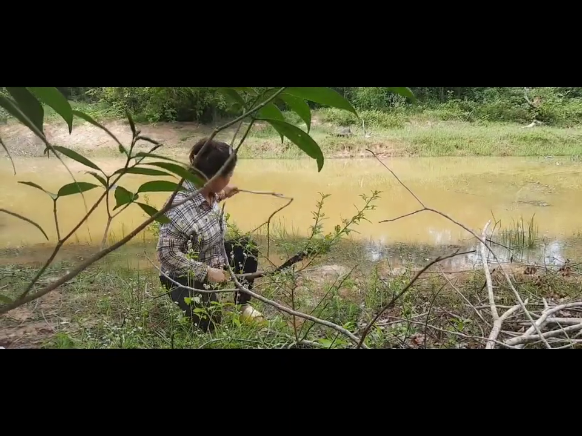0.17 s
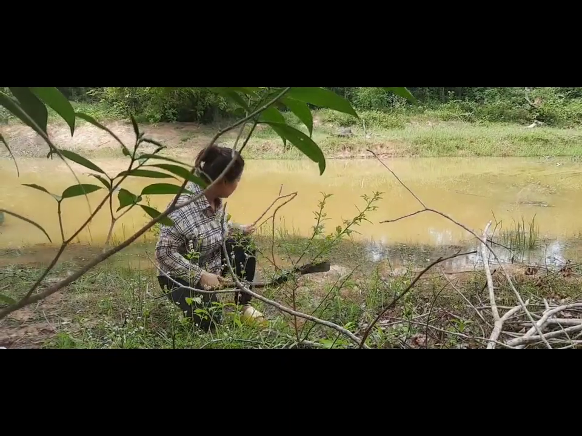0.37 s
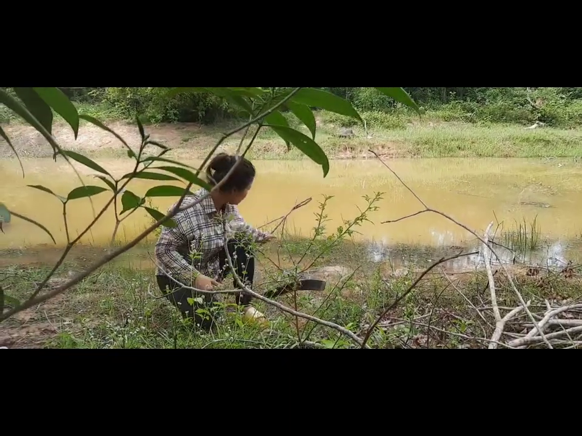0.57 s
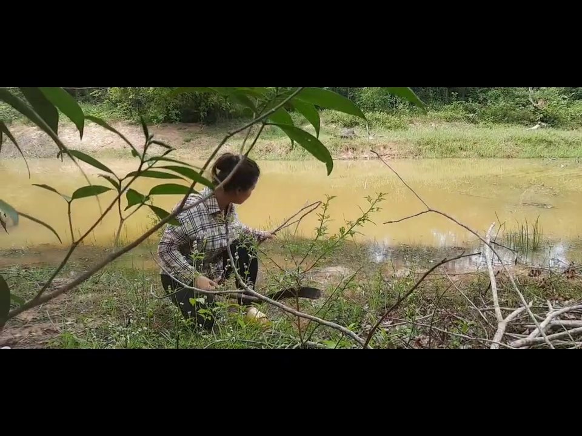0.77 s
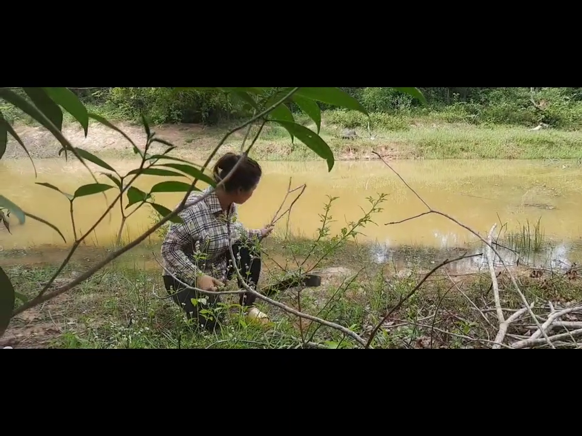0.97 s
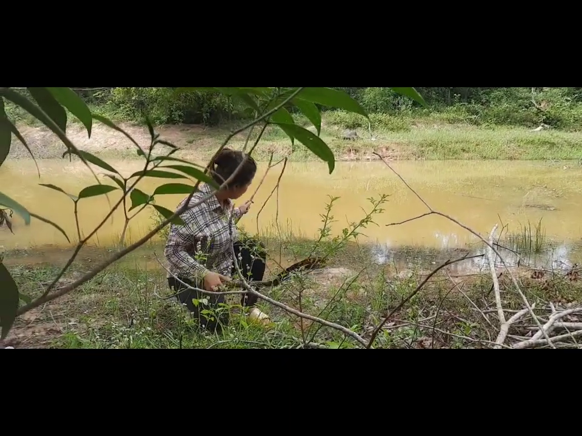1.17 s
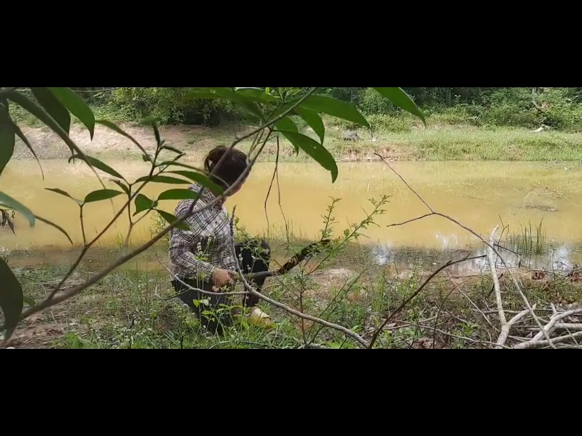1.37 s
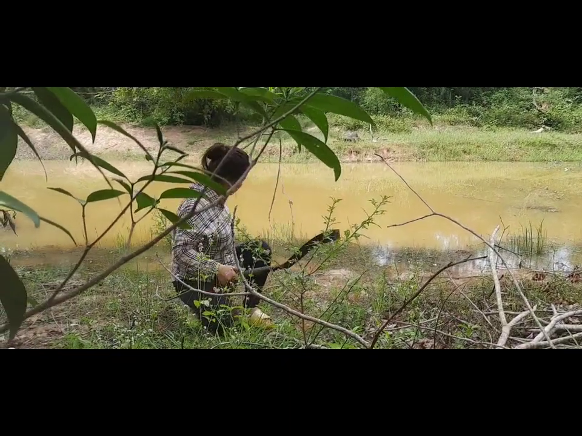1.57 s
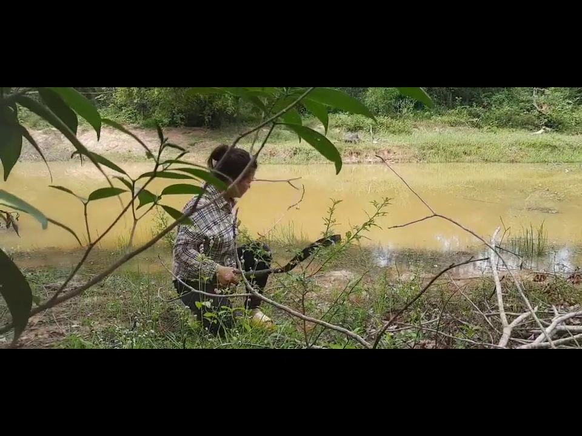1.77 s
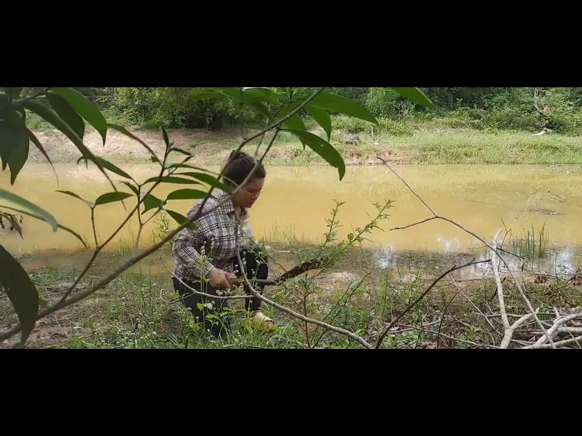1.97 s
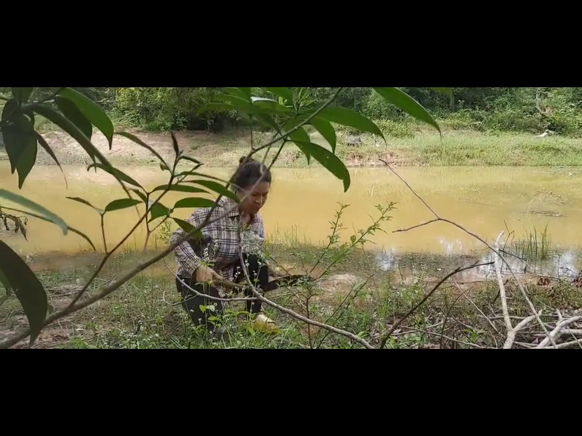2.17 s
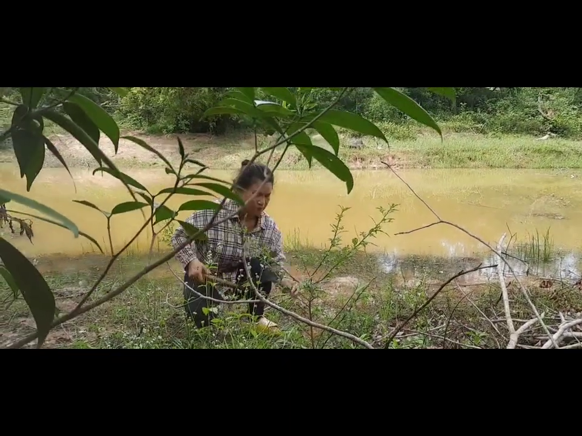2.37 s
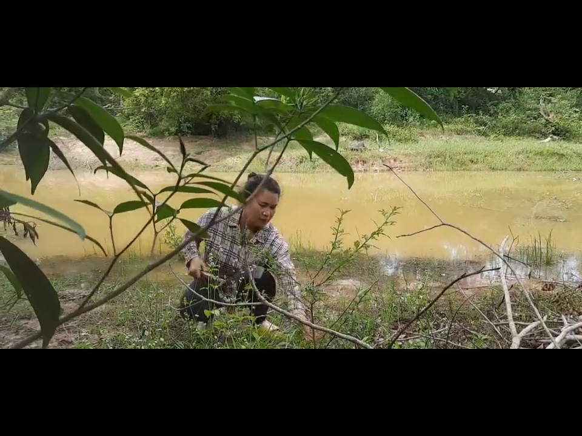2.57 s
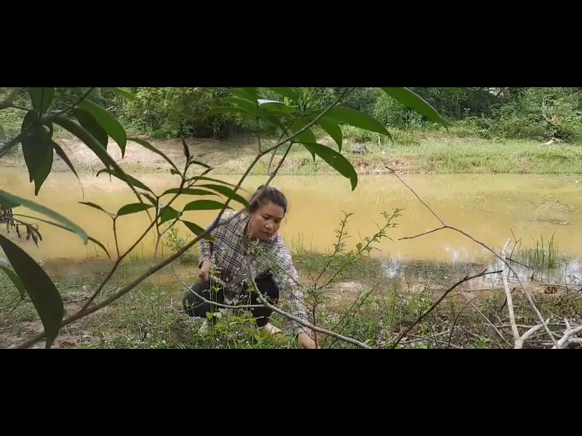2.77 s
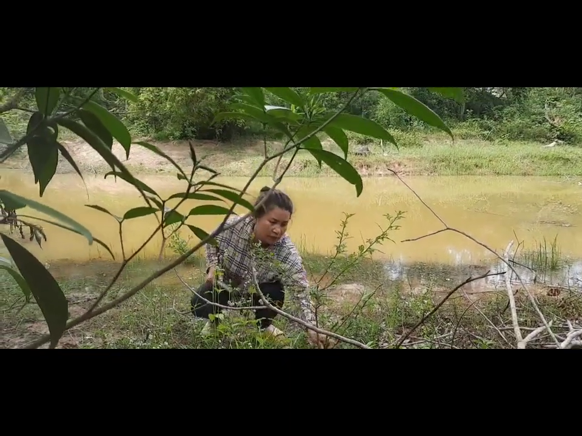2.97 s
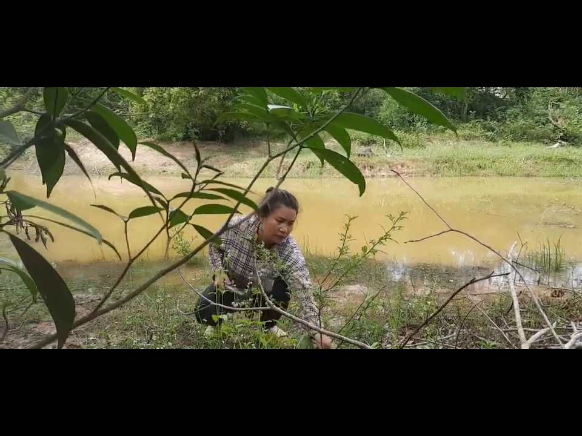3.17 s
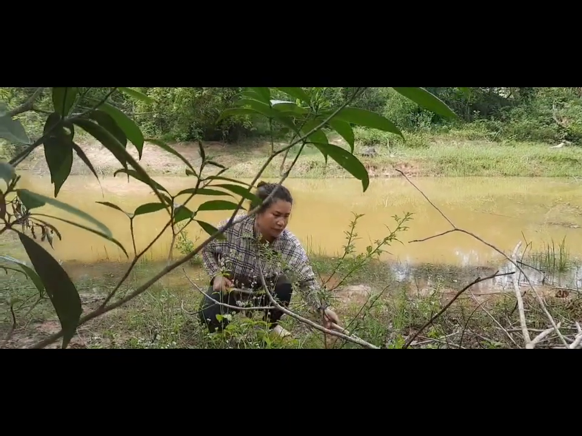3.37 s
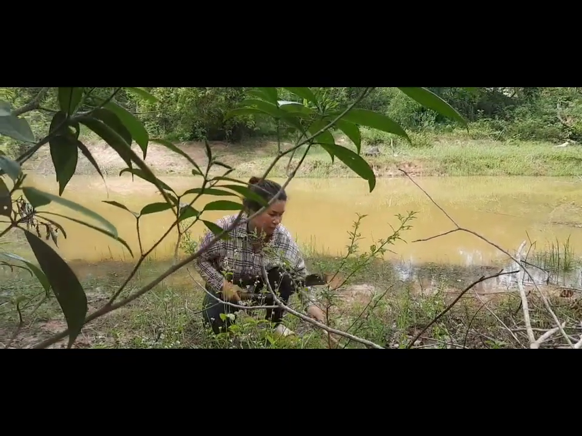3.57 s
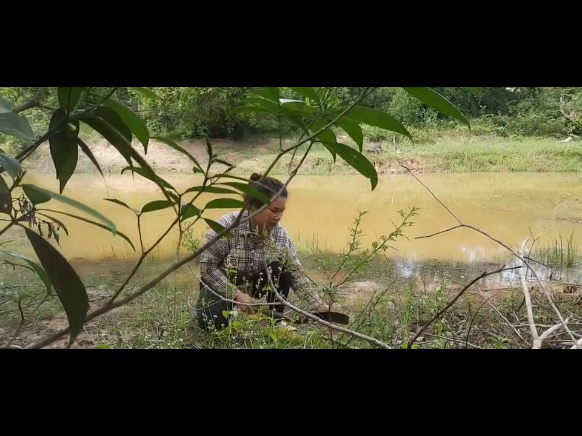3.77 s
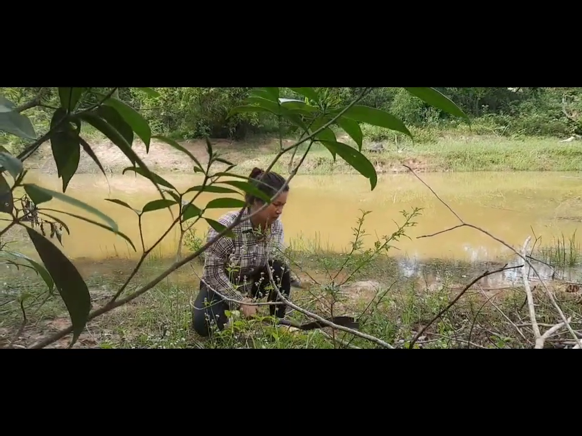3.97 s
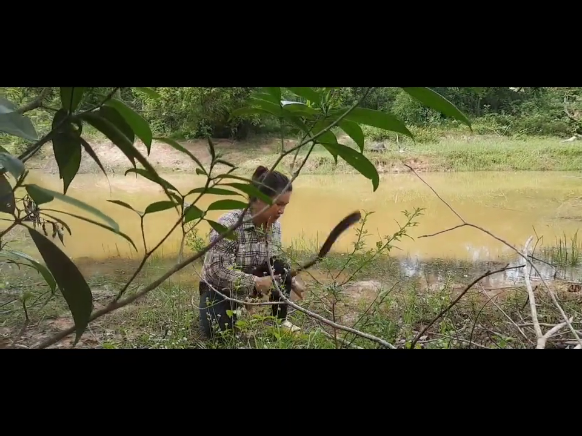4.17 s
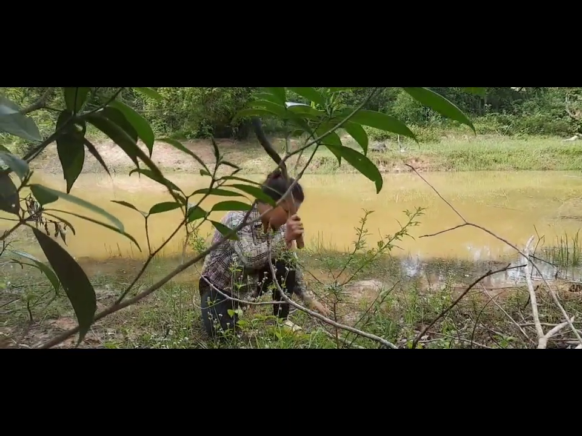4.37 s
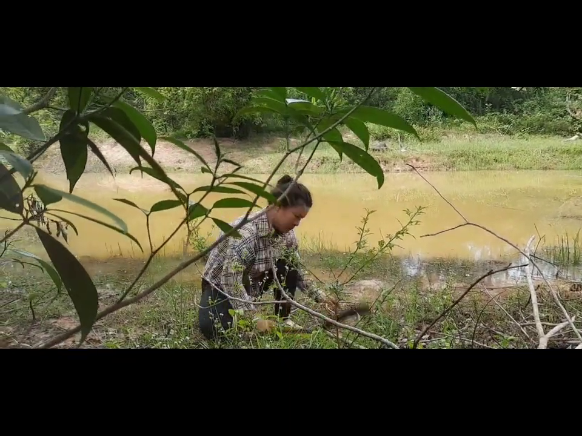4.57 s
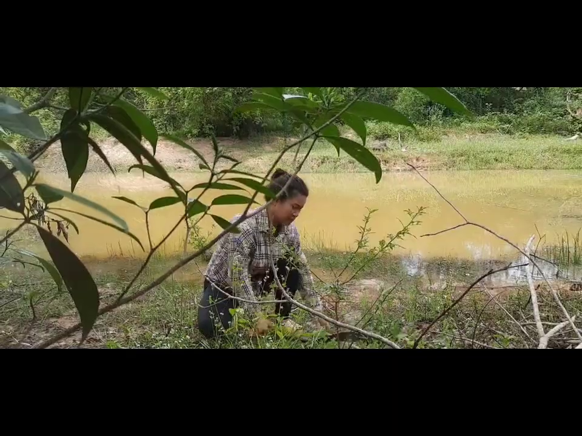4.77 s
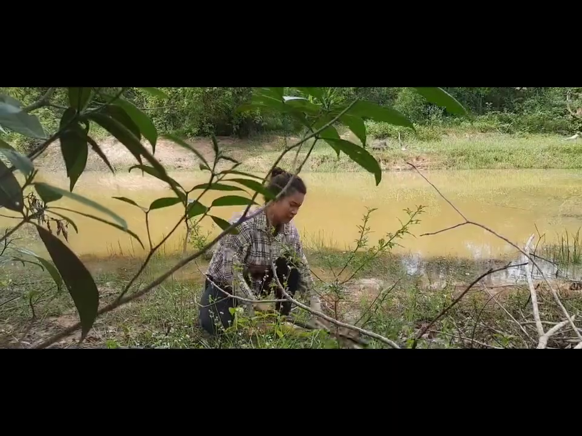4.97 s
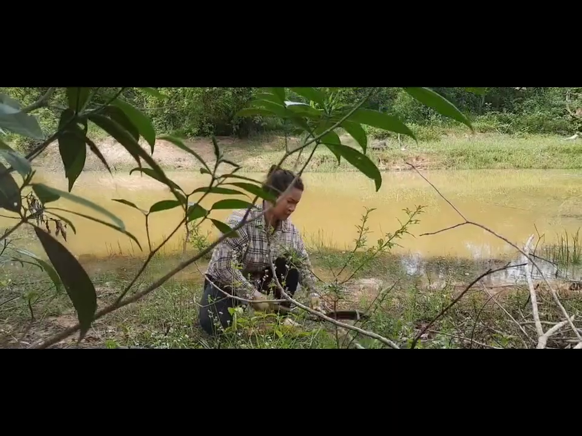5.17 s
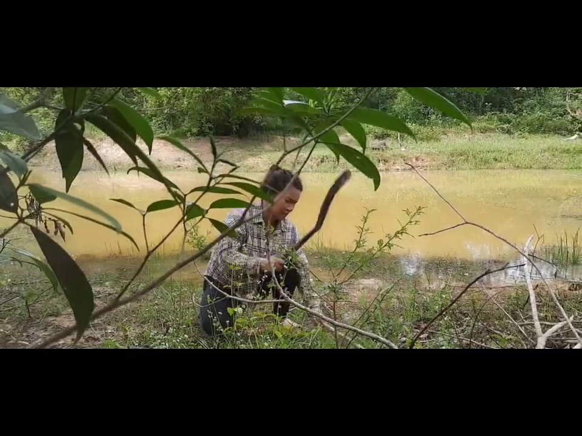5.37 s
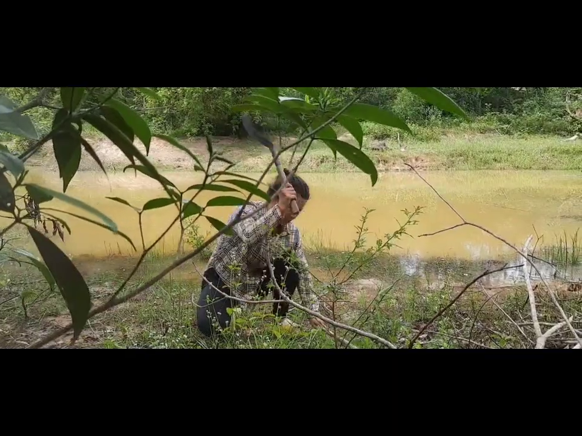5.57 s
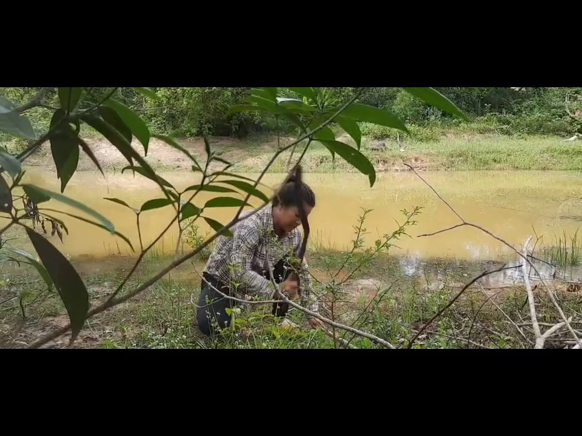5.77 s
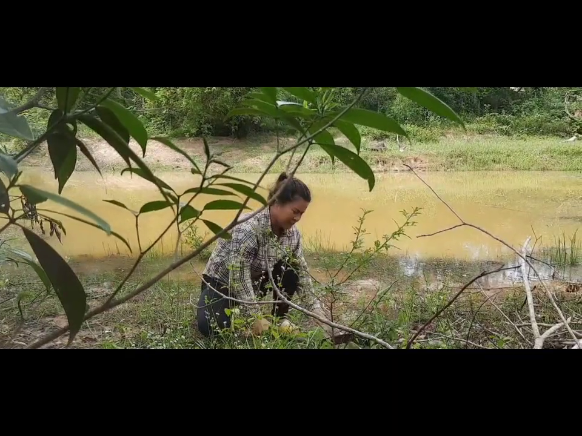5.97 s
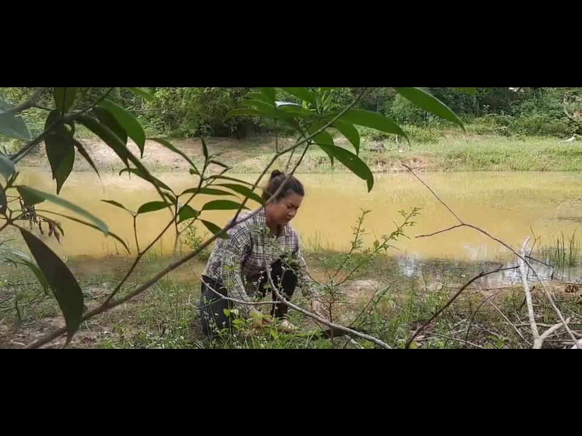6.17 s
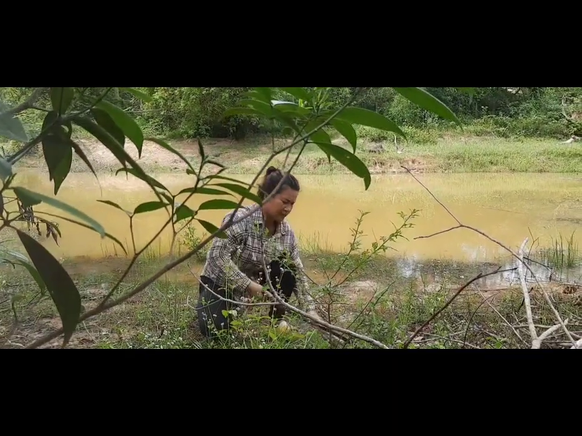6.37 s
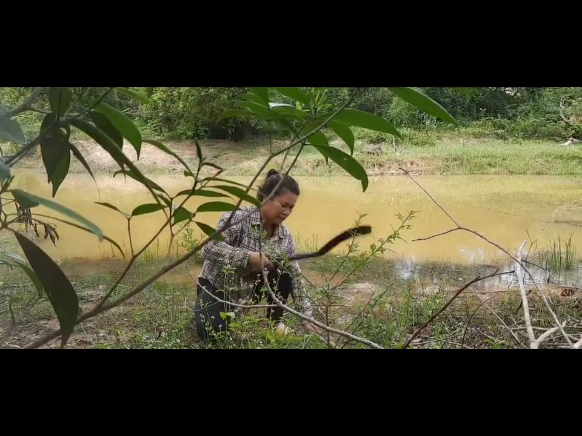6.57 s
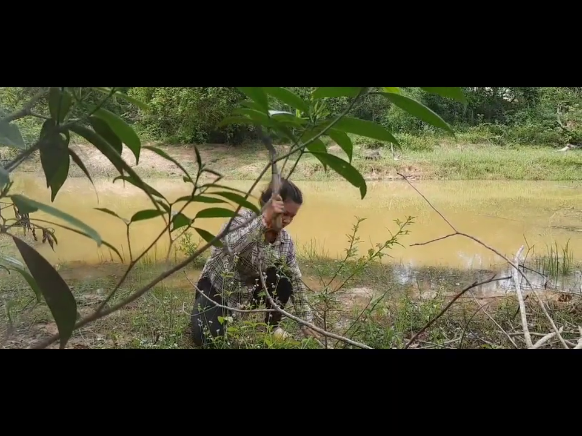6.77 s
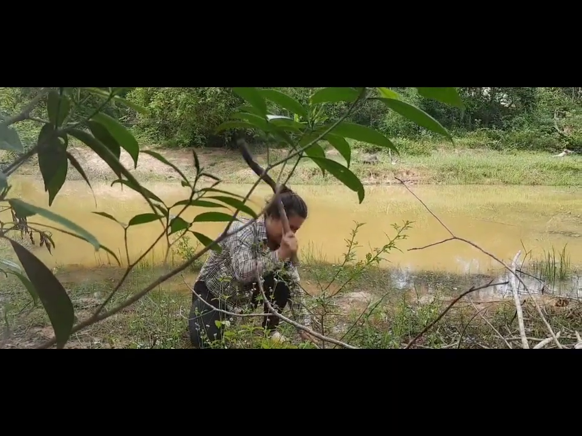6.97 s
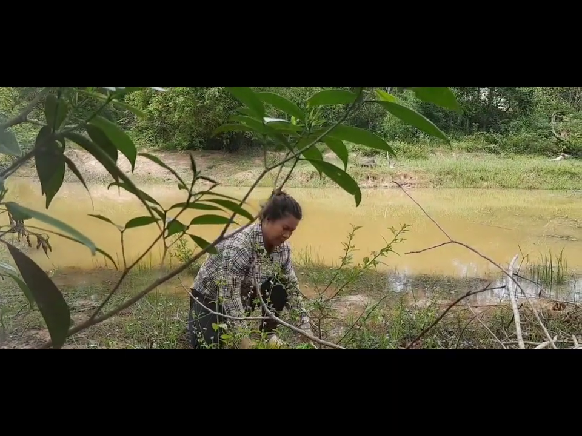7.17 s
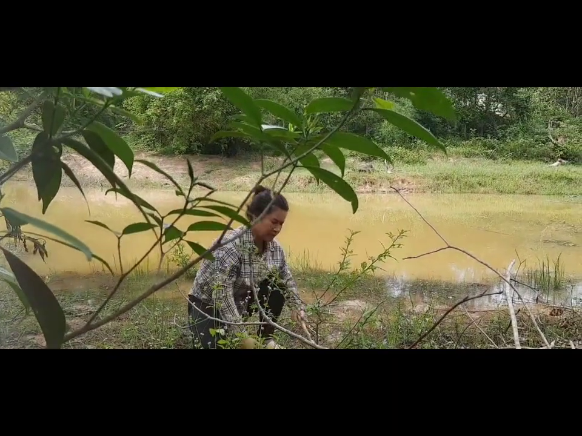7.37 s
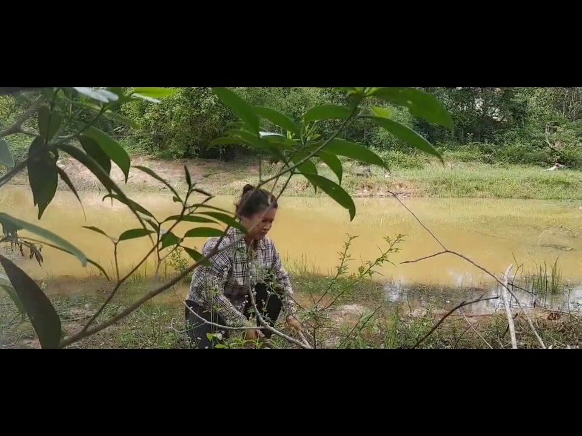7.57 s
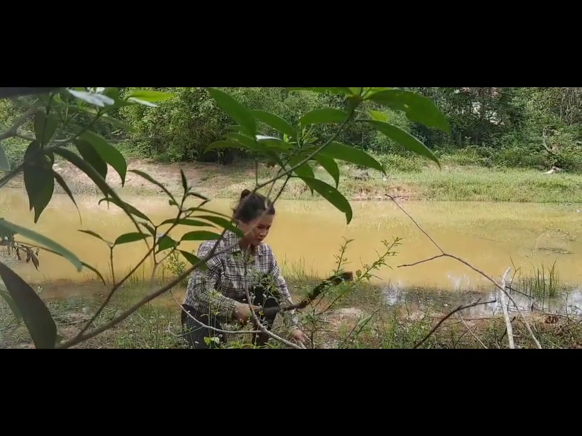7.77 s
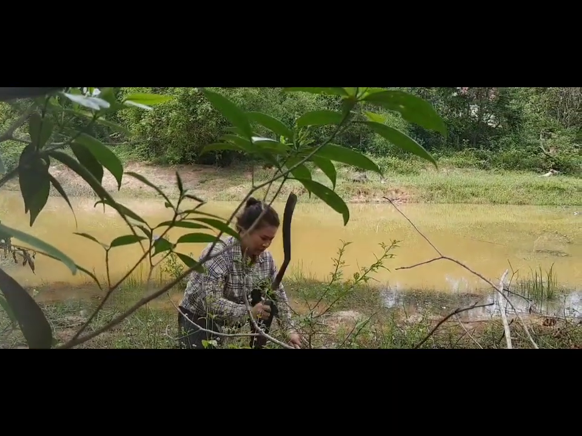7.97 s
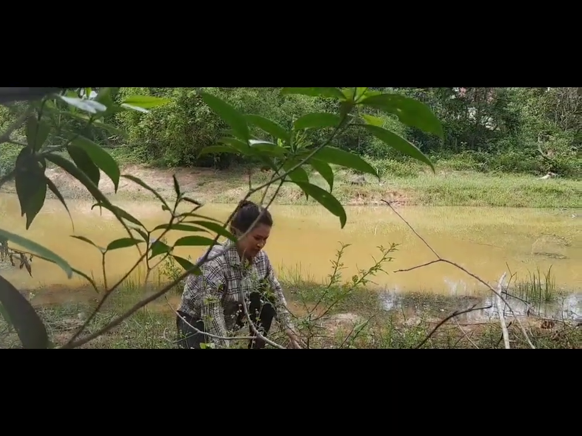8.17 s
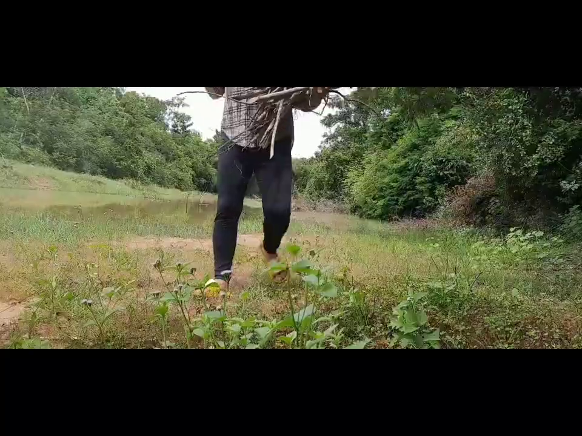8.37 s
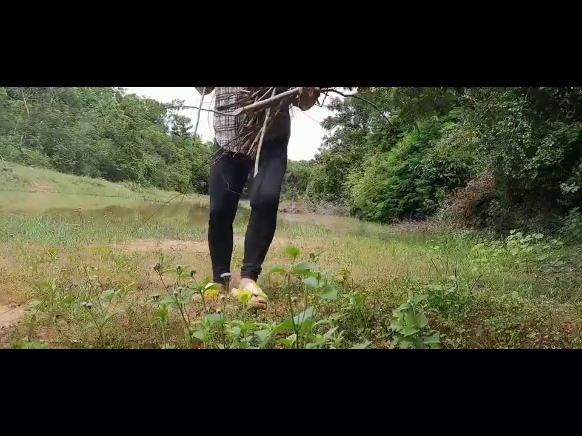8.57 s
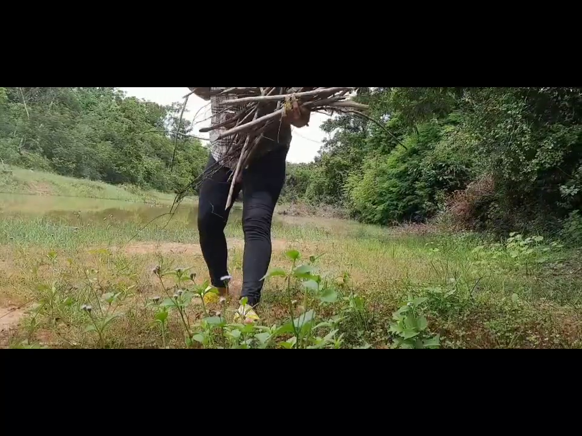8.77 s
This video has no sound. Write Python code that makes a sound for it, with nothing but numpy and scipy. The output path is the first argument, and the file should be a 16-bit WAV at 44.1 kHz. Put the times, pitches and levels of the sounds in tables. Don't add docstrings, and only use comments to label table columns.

```python
import sys
import numpy as np
from scipy import signal
from scipy.fft import rfft, irfft, next_fast_len
from scipy.io import wavfile

SR = 44100
rng = np.random.default_rng(int(sys.argv[2]) if len(sys.argv) > 2 else 0)


def amplitude_ratio(level_db):
    exponent = np.asarray(level_db, float) / 20
    return 10 ** exponent


def put_to_file(sound):
    columns = np.atleast_2d(sound).T
    safe = np.clip(columns, -1, 1)
    whole_steps = np.round(safe * 32767)
    wavfile.write(sys.argv[1], SR, whole_steps.astype(np.int16))


N = 388068
HZ = np.maximum(np.arange(next_fast_len(N) // 2 + 1) * SR / next_fast_len(N), 1)
DROPOUT_START_S, DROPOUT_END_S = 8.25, 8.281

# start in seconds, crack peak in dB, crack build-up in seconds, brightness in dB,
# hollow part in dB.
BLOWS = [
    (4.6031, -3, 0.0031, 6, -5),
    (5.8564, -2.5, 0.0044, 1, 1.5),
    (7.1215, -2.5, 0.0022, -2, -5),
    (8.1283, -8.5, 0.004, 0, -11),
]
# full weight lands in seconds after the start, bite of the edge in dB,
# ground wave in dB, loose debris in dB.
WEIGHTS = [
    (.004, -15, -37, -48),
    (.005, -13, -38, -47),
    (.0045, -14, -36, -48),
    (.0042, -32, -41, -56),
]
# mode in Hz, level in dB, 60 dB decay in seconds.
THUD_1 = [(132, 3, 0.06), (215, -10, 0.042), (312, -7.5, 0.056), (390, -10.5, 0.029), (735, -13, 0.04),
          (950, -11, .02), (2300, -18.5, 0.024)]
THUD_2 = [(140, 3.5, 0.055), (275, 3.5, 0.034), (404, 2, .04), (543, -13, 0.01), (711, -6, .025),
          (850, -10, 0.02), (1250, -7, .022)]
THUD_3 = [(137, 3, 0.061), (278, -5.5, 0.044), (380.3, -3.5, 0.02), (438, -11.5, 0.077), (800, -8.5, 0.016),
          (1560, -11, .03), (1800, -11, .03)]
THUD_4 = [(139, -9.5, 0.055), (280, -21, .05), (400, -25, .04), (1000, -25.5, 0.038), (1330, -14, 0.02),
          (1837, -19.5, .05)]
# frequency in Hz, density in dB per Hz.
CRACK = [(290, -29), (500, -3), (579, -10.5), (1000, -12), (1760, -7), (3450, -21), (6010, -8.5),
         (8540, -21), (11100, -14.5), (15600, -24), (16500, -37)]
# frequency in Hz, likeness from -1 to 1.
BLOW_LIKENESS = [(500, 0.72), (1500, 0.21), (4000, .2), (12000, 0.)]
# mode in Hz, level in dB, 60 dB decay in seconds.
BLADE = [(3630, -14, 0.082), (4020, -2.5, 0.03), (5230, -19, 0.079), (7200, -6.5, 0.086),
         (10800, -11, 0.028)]
# time in seconds, level in dB.
BLADE_TAPS = [
    (3.7265, -35.5),
    (7.403, -30.5),
]

# time in seconds, bright edge peak in dB, edge centre in Hz, left-right in dB.
TICKS = [(0.6784, -67, 6660, 4.0), (2.0781, -27, 12500, 2.0), (2.5664, -66, 12000, 7.0),
         (2.789, -44, 12900, 8.5), (2.8365, -42, 11100, 8.0), (2.8873, -52, 10200, 6.5),
         (2.9917, -49, 6880, 4.0), (3.2369, -40, 11100, 6.0), (3.276, -32, 6720, 5.5),
         (3.316, -38, 11200, 4.0), (3.6602, -38, 12900, 6.0), (3.6854, -40, 12400, 6.0),
         (3.9264, -59, 12300, 4.0), (4.0667, -58, 9030, 5.5), (4.1249, -49, 8170, 2.5),
         (4.803, -35, 11300, 4.0), (4.8712, -35, 11500, 3.0), (4.9141, -49, 8050, 4.0),
         (4.9355, -43, 10900, 4.5), (5.1561, -43, 11600, 5.0), (5.3288, -46, 11200, 5.0),
         (5.3574, -50, 12100, 4.5), (5.4659, -42, 11200, 4.0), (6.0256, -29, 10600, 3.5),
         (6.2964, -46, 12400, 5.0), (6.554, -51, 7040, 4.5), (6.6474, -56, 10900, 3.5),
         (7.2613, -32, 7440, 0.0), (7.2708, -44, 6510, 2.5), (7.623, -52, 7060, 5.0),
         (8.3089, -43, 7110, -1.0), (8.5174, -61, 7040, -0.5)]
# time in seconds, bright edge peak in dB, ringing in Hz, its level in dB.
SNAPS = [(.0334, -64, 1290, -17), (.166, -46, 4340, -7), (.187, -37, 3000, -14), (.2344, -42, 1400, -16),
         (.4524, -58, 4290, -15), (.5531, -59.5, 1310, -2.5), (.7542, -54.5, 1640, -11),
         (.9814, -55, 1640, -12), (1.1094, -64, 4420, 0), (2.0787, -39, 4200, 2), (3.049, -50, 1480, -6),
         (3.1058, -31, 4950, -1), (3.1742, -36, 1820, -8.5), (3.3344, -41.5, 4540, -7),
         (3.4096, -32, 1910, -12), (3.5724, -40, 4370, -1), (3.5785, -37, 4500, 0), (3.595, -41, 4800, 0),
         (3.869, -44, 4000, -3), (3.9938, -54, 4220, -9), (4.115, -49, 1470, -6),
         (4.1844, -46.5, 1510, -17), (4.9796, -41, 2080, -16), (6.1784, -46, 3980, -11),
         (6.3594, -48, 4520, -9), (7.391, -37.5, 3780, -7.5), (7.4035, -18, 2100, -15)]
# time in seconds, bright edge peak in dB, ringing in Hz, its level in dB,
# dull part in dB.
KNOCKS = [(.156, -51, 3490, -24, -10), (.2094, -41, 3720, -3.5, -14), (.7244, -64.5, 1560, 6, -11),
          (1.7294, -69, 1300, 4, 2.5), (2.0138, -35, 1490, -17, -14), (2.1276, -49, 3950, 3.5, -9),
          (2.1544, -62.5, 1520, 4, -17), (2.2994, -60.5, 1540, -6, -18), (3.727, -33, 4400, -2, -16),
          (3.7275, -45, 1600, 6, -6), (3.7494, -40, 1500, -1.5, -11), (4.7047, -37, 1720, -1.5, -2),
          (4.7535, -45, 1700, 3, 0), (4.7396, -31, 1450, -9, -11), (5.9605, -28, 1600, -7, -13),
          (6.0726, -38.5, 1400, -1.5, -7), (7.2244, -41, 1900, -4, -6), (8.3285, -44, 4600, -3, 3),
          (8.7944, -47.5, 1000, -21, 17)]

# fullest at seconds, 20 dB rise in seconds,
# 20 dB fall in seconds, leaves in dB, twigs over leaves in dB.
DRAGS = [(.012, .02, .25, -82, -12), (.455, .02, .04, -62, -12), (.98, .02, .03, -68, -8),
         (2.255, .03, .07, -62, -10), (.195, .03, .1, -50, -7), (.417, .12, .5, -69.5, -8),
         (.763, .08, .08, -68, -3), (1.081, .4, .2, -77, -6), (1.9, .7, .1, -80, -7),
         (2.025, .015, .03, -52, -10), (2.06, .03, .7, -66, -6), (2.815, .13, .1, -59, -14),
         (3.01, .03, .2, -61, -14), (3.062, .02, .06, -64, 3), (3.413, .008, .04, -43, -8),
         (4.02, .02, .03, -62, -8), (4.432, .015, .05, -59, -8), (3.18, .008, .04, -55, -5),
         (3.245, .008, .06, -54, -12), (3.7, .04, .03, -53, -10), (6.358, .03, .04, -53, -10),
         (6.52, .05, .08, -63, -14), (3.43, .45, .3, -48.5, -7), (3.582, .07, .1, -49, -3),
         (3.72, .2, .08, -55, -3), (3.865, .08, .05, -54, 0.5), (4.13, .13, .2, -65, -5),
         (4.53, .3, .08, -66, -13), (5.335, .55, .28, -57.5, -12), (6.34, .5, .55, -59.5, -11),
         (7.8, .5, .9, -77, -4), (7.63, .05, .1, -66, -11)]
REBOUNDS = [
    (4.709, .04, .2, -46.5, -3),
    (4.808, .012, .05, -49, -8),
    (4.93, .2, .22, -59, -7),
    (6.004, .05, .12, -47.5, -8),
    (6.11, .05, .6, -62, -5),
    (7.26, .04, .45, -63, 3),
    (7.43, .02, .24, -58, -7),
]
STEPS = [
    (8.322, .04, .14, -66, 2.5),
    (8.66, .22, .6, -60, -12),
    (8.77, .15, .1, -66, 9),
]
# frequency in Hz, density in dB per Hz.
LEAVES = [(3350, -34.5), (5700, 2.5), (7040, -2), (7880, -10), (10900, -1.5), (12200, -2), (14200, -2.5),
          (16000, -9)]
# frequency in Hz, density in dB per Hz.
TWIGS = [(590, -38), (1000, -14.5), (1190, -11.5), (1440, -1), (2780, -6), (3030, -8.5), (4800, -1),
         (6240, -33.5), (10600, -120)]
# frequency in Hz, width in Hz, level in dB.
STICK = [(694, 81, -9), (1490, 50, 0), (1720, 40, -2), (2130, 40, -5), (2510, 67, -6), (2730, 40, -8),
         (3250, 40, -11), (3650, 40, -6), (3980, 94, -3), (4190, 40, -9), (5900, 40, -9), (6160, 40, -9)]
# time in seconds, level in dB.
SCRAPE = [
    (3.725, -90.),
    (3.74, -66),
    (3.775, -63),
    (3.8, -71),
    (3.84, -53),
    (3.87, -47),
    (3.895, -88),
]

# start in seconds, end in seconds, centre in Hz, width in Hz, level in dB.
NARROW_SOUNDS = [(0., .15, 6940, 1300, -75.5), (1.78, 2., 7220, 270, -72), (1.86, 2., 7740, 700, -77),
                 (6.39, 6.53, 7100, 300, -69), (3.85, 4.1, 36, 25, -59), (5.07, 5.25, 36, 25, -72),
                 (4.69, 4.728, 480, 420, -49), (8.56, 8.78, 12600, 1200, -69), (1.5, 1.62, 2150, 60, -84),
                 (6.69, 6.75, 2160, 80, -81), (7.94, 8.11, 3900, 600, -78), (4.44, 4.485, 62, 50, -55),
                 (3.955, 4.0, 62, 50, -55), (1.71, 1.8, 1330, 360, -77), (8.57, 8.74, 1170, 320, -68),
                 (8.55, 8.79, 2140, 1200, -64), (8.281, 8.37, 3850, 400, -73), (8.36, 8.5, 3800, 400, -81),
                 (8.35, 8.8, 208, 43, -67.5), (6.15, 6.55, 310, 150, -70), (2.0, 2.06, 288, 200, -65)]
# time in seconds, pitch in Hz, level in dB.
FAR_CALL = [
    (7.7, 520, -89.),
    (7.799, 534, -82),
    (7.9, 571, -86.5),
    (8.05, 600, -88),
    (8.12, 587, -89),
]
# time in seconds, level in dB.
CHORUS = [
    (0., -58),
    (2.0, -57),
    (3.8, -55),
    (4.6, -58),
    (8.8, -58),
]
# pitch in Hz, level in dB.
SINGERS = [(5190, -67), (5260, -65), (5335, -66)]

# time in seconds, rumble in dB.
BREEZE = [
    [(0.0, -66), (1.15, -62), (1.7, -64.5), (1.9, -59.5), (3.08, -63.5), (3.75, -57.5), (4.1, -58),
     (4.3, -65), (4.75, -59), (4.95, -64), (5.76, -67), (5.95, -59), (6.2, -64), (6.61, -64), (7.2, -59),
     (7.35, -63), (8.15, -66)],
    [(8.3, -45), (8.362, -51), (8.8, -54)],
]
# frequency in Hz, density in dB per Hz.
RUMBLE = [(12, -53), (20, -24), (65, -2), (86, 2), (129, -3), (149, -9), (178, -17), (220, -28), (290, -53),
          (480, -120)]
# frequency in Hz, density in dB per Hz.
AIR = [(150, -12.5), (330, 5.5), (600, -7), (1500, -13), (4000, -16.5), (6500, -15.5), (8500, -19.5),
       (10000, -19), (10800, -9), (11900, -16), (13500, -17.5), (16000, -21)]
# frequency in Hz, gain in dB.
QUIET_TOP = [(15700, 0.), (16100, -40.)]
# frequency in Hz, likeness from -1 to 1.
LIKENESS = [(60, 0.89), (180, 1), (550, 0.42), (1650, 0.049), (4970, -0.017), (15000, -0.29)]
# frequency in Hz, left-right in dB.
PORTS = [(60, 2.5), (110, 0.5), (200, 2.5), (380, -0.5), (700, 6.5), (1290, 3.5), (2380, 2.5), (4400, 1.5),
         (8120, 1), (15000, 8)]

THUD_DB = -10.0
GROUND_HZ, GROUND_TROUGH_S, GROUND_PEAK_S, GROUND_RIGHT_DB = 59, .042, .03, -3
TICK_HZ, TICK_RING_DB = 4200, -25
THIN_DULL_DB = -36
EDGE_HZ, EDGE_SPREAD = 7500, 1.75
PILE_PAN_DB, PATH_PAN_DB = 4, -8
JOLT_S, JOLT_DB, JOLT_FALL_S, JOLT_TWIGS_DB = .02, -35.5, .097, -2
WOOD_DB, WOOD_FALL, TWIG_FALL = -10, .6, .95
STILL_DB, WOOD_STILL_DB = -97, -87
BUZZ_RISE = .4
CHORUS_HZ, CHORUS_WIDTH_HZ = 5240, 335
SKIRT_DB, SKIRT_WIDTH_HZ = -28.5, 600
PATH_CHORUS_HZ, PATH_CHORUS_WIDTH_HZ, PATH_CHORUS_DB = 5130, 250, -58.5
AIR_DB = -78.5
MURMUR_DB, MURMUR_FOLLOWS, MURMUR_TOP_DB = -77, 2.4, -68


def rms_one(x):
    return x / np.sqrt(np.mean(x ** 2) + 1e-20)


def in_time(tables):
    rows = list(tables[0])
    for table in tables[1:]:
        hold_until = max(table[0][0] - .02, rows[-1][0])
        rows += [(hold_until, *rows[-1][1:]), *table]
    s, *columns = np.transpose(rows)
    return [np.interp(np.arange(N) / SR, s, column) for column in columns]


def at_hz(points):
    hz, value = np.transpose(points)
    return np.interp(np.log(HZ), np.log(hz), value)


def colour(x, gain):
    size = next_fast_len(N)
    return irfft(rfft(x, size) * gain, size)[..., :N]


def band(x, low_hz, high_hz, order=2):
    edges = np.clip([low_hz, high_hz], 15, .45 * SR)
    return signal.sosfilt(signal.butter(order, edges, "band", fs=SR, output="sos"), x)


def stereo_noise(likeness):
    alike = np.clip(at_hz(likeness), -1, 1)
    mid, side = rng.standard_normal((2, N))
    mid = colour(mid, np.sqrt(1 + alike))
    side = colour(side, np.sqrt(1 - alike))
    return rms_one(mid + side * [[1], [-1]])


def drift(rate):
    r = np.exp(-40 * np.pi * rate / SR)
    slow = signal.lfilter([1], [1, -2 * r, r * r], rng.standard_normal(N // 20 + 3002))
    slow = slow[3000:]
    return np.interp(np.arange(N) / 20, np.arange(len(slow)), rms_one(slow))


def ring(clicks, hz, t60):
    r, w = amplitude_ratio(-60 / (t60 * SR)), 2 * np.pi * hz / SR
    return signal.lfilter([0, np.sin(w)], [1, -2 * r * np.cos(w), r * r], clicks + 1e-18)


def add(out, s, piece):
    at = round(s * SR)
    out[:, at:at + piece.shape[-1]] += piece[..., :N - at]


def crackle(per_s, spread_db, tick_s, bed):
    sizes = amplitude_ratio(spread_db * np.minimum(rng.exponential(1, N), 4)) * (rng.random(N) < per_s / SR)
    bursts = signal.lfilter([1], [1, -np.exp(-1 / (tick_s * SR))], sizes)
    return bed + bursts / bursts.mean()


def patches(x, low_hz, high_hz, count, patchy_db, rate):
    edges = np.geomspace(low_hz, high_hz, count + 1)
    total = 0
    for k, (low, high) in enumerate(zip(edges, edges[1:])):
        total = total + (-1) ** k * amplitude_ratio(patchy_db * drift(rate)) * band(x, low, high)
    return rms_one(total)


def swells(peak_s, rise_s, fall_s, db, still_db):
    since = np.arange(0, N, 20) / SR - peak_s[:, None]
    down = np.where(since < 0, -since / rise_s[:, None], since / fall_s[:, None])
    power = amplitude_ratio(2 * still_db) + amplitude_ratio(2 * (db[:, None] - 20 * down)).sum(axis=0)
    return np.interp(np.arange(N) / 20, np.arange(len(power)), np.sqrt(power))


def blows():
    out, age = np.zeros((2, N)), np.arange(round(.4 * SR)) / SR
    splinter = colour(stereo_noise(BLOW_LIKENESS), amplitude_ratio(at_hz(CRACK)))
    for k, (row, weight, modes) in enumerate(zip(BLOWS, WEIGHTS, (THUD_1, THUD_2, THUD_3, THUD_4))):
        s, crack_db, build_s, bright_db, hollow_db = row
        land_s, bite_db, ground_db, debris_db = weight
        after = np.maximum(age - build_s, 0)
        swell = np.minimum(age / build_s, 1) ** 1.2

        noise = splinter[:, k * len(age):(k + 1) * len(age)]
        noise = noise + (amplitude_ratio(bright_db) - 1) * band(noise, 4000, 17000, order=1)
        noise = rms_one(noise + (amplitude_ratio(hollow_db) - 1) * band(noise, 500, 1800, order=1))
        crack = noise * swell * (amplitude_ratio(-60 * after / 0.013) + 0.39 * amplitude_ratio(-60 * after / 0.065))

        landing = band(1. * (np.arange(len(age)) == round(land_s * SR)), 160, 9000)
        thud = sum(amplitude_ratio(db) * ring(landing, hz, ring_s) for hz, db, ring_s in modes)
        bite = -band(1. * (np.arange(len(age)) == round(build_s * SR)), 350, 1400, order=1)
        bite = bite / np.abs(bite).max()

        debris = rms_one(band(rng.standard_normal((2, len(age))), 400, 1600)) * swell * amplitude_ratio(-60 * after / .3)
        shaking = rms_one(band(rng.standard_normal((2, len(age))), 140, 360)) * swell * amplitude_ratio(-60 * after / .4)
        add(out, s, amplitude_ratio(bite_db) * bite + amplitude_ratio(ground_db) * ground_wave(age) + amplitude_ratio(debris_db + 8) * debris)
        add(out, s, amplitude_ratio(crack_db - 9.5) * crack + amplitude_ratio(THUD_DB) * thud + amplitude_ratio(crack_db - 36.5) * shaking)
    return out


def ground_wave(age):
    grown = age / GROUND_PEAK_S
    wave = -np.cos(2 * np.pi * GROUND_HZ * (age - GROUND_TROUGH_S)) * (grown * np.exp(1 - grown)) ** 2
    return wave * amplitude_ratio([[0], [GROUND_RIGHT_DB]])


def blade():
    out, click = np.zeros((2, N)), 1. * (np.arange(SR // 4) == 0)
    note = sum(amplitude_ratio(db) * ring(click, hz, t60) for hz, db, t60 in BLADE)
    for s, db in BLADE_TAPS:
        add(out, s, amplitude_ratio(db) * note)
    return out


def all_breaks():
    rows = []
    for s, db, edge_hz, pan_db in TICKS:
        rows.append((s, db + 1.5, TICK_HZ, TICK_RING_DB, THIN_DULL_DB, pan_db, edge_hz, .22))
    for row in [(*snap, THIN_DULL_DB) for snap in SNAPS] + list(KNOCKS):
        side_db = PATH_PAN_DB if row[0] > DROPOUT_START_S else PILE_PAN_DB
        rows.append((*row, side_db, EDGE_HZ, .25))
    return rows


def snaps():
    out, age = np.zeros((2, N)), np.arange(round(.06 * SR)) / SR
    for s, db, hz, ringing_db, dull_db, pan_db, edge_hz, linger in all_breaks():
        shared, *own = rng.standard_normal((3, len(age)))
        burst = (.6 * shared + .8 * np.array(own)) * (1 - np.exp(-age / 0.0001))
        edge = burst * (np.exp(-age / 0.0015) + linger * np.exp(-age / .012))
        edge = band(edge, edge_hz / EDGE_SPREAD, edge_hz * EDGE_SPREAD, order=3)
        ringing = band(burst * np.exp(-age / 0.006), hz / 1.3, hz * 1.3)
        knock = band(burst * np.exp(-age / 0.0059), 350, 1080)
        parts = [(edge, 0), (ringing, ringing_db), (knock, dull_db)]
        snap = sum(amplitude_ratio(part_db) * part / np.abs(part).max() for part, part_db in parts)
        pan = amplitude_ratio(np.array([[.4], [-.4]]) * pan_db)
        add(out, s - .0005, amplitude_ratio(db + 1.5) * snap * pan)
    return out


def rustle():
    jolts = [(s + JOLT_S, .005, JOLT_FALL_S, db + JOLT_DB, JOLT_TWIGS_DB) for s, db, *_ in BLOWS]
    s, rise, fall, db, twigs_db = np.transpose(list(DRAGS) + list(REBOUNDS) + list(STEPS) + jolts)
    rise, fall = np.maximum(rise, .003), np.maximum(fall, .003)

    grains = stereo_noise(LIKENESS) * crackle(700, spread_db=3.6, tick_s=0.002, bed=1.7)
    grains = grains * amplitude_ratio(1.8 * drift(20))
    leaves = rms_one(colour(grains, amplitude_ratio(at_hz([(3500, -34.0)] + LEAVES) + at_hz(QUIET_TOP))))
    leaves = patches(leaves, 3300, 16500, count=4, patchy_db=1.5, rate=10.)
    twigs = colour(grains, amplitude_ratio(at_hz([(600, -31.0)] + TWIGS + [(6500, -30.5)])))
    twigs = patches(twigs, 800, 6000, count=6, patchy_db=2.5, rate=18.)
    wood = rms_one(band(grains, 450, 950))

    leaves_gain = swells(s, rise, fall, db + 1.85, STILL_DB)
    twigs_gain = swells(s, rise, TWIG_FALL * fall, db + twigs_db + 1.8, STILL_DB)
    wood_gain = swells(s, WOOD_FALL * rise, WOOD_FALL * fall, db + twigs_db + WOOD_DB, WOOD_STILL_DB)
    return leaves_gain * leaves + twigs_gain * twigs + wood_gain * wood


def scrape():
    level_db, = in_time([[(3.7, -140)] + SCRAPE + [(3.92, -140)]])
    slips = rng.standard_normal(N) + .6 * rng.standard_normal((2, N))
    slips = slips * crackle(290, spread_db=3.5, tick_s=.0015, bed=0.55)
    notes = sum(amplitude_ratio(db) * rms_one(ring(slips, hz, 2.8 / width_hz)) for hz, width_hz, db in STICK)
    return amplitude_ratio(level_db) * rms_one(notes)


def far_animals():
    t, out = np.arange(N) / SR, np.zeros((2, N))
    for start, end, hz, width_hz, db in NARROW_SOUNDS:
        age = t[:round((end - start) * SR)]
        hiss = band(rng.standard_normal((2, len(age))), hz - width_hz / 2, hz + width_hz / 2, order=3)
        grow = age / (BUZZ_RISE * age[-1]) + .05
        fade = age[::-1] / .02
        add(out, start, amplitude_ratio(db) * rms_one(hiss) * np.clip(np.minimum(grow, fade), 0, 1))
    pitch, call_db = in_time([[(7.6, 520, -140)] + FAR_CALL + [(8.14, 590, -140)]])
    turns = 2 * np.pi * np.cumsum(pitch * (1 + .003 * drift(40))) / SR
    overtones = np.sin(3 * turns) + np.sin(4 * turns)
    return out + amplitude_ratio(call_db + 2.2 * drift(25)) * overtones


def chorus():
    insects_db, = in_time([CHORUS])
    white, off_hz = rng.standard_normal((2, N)), np.abs(HZ - CHORUS_HZ)
    core = np.exp(-(off_hz / (.6 * CHORUS_WIDTH_HZ)) ** 2.05)
    skirt = amplitude_ratio(SKIRT_DB) * np.exp(-(off_hz / SKIRT_WIDTH_HZ) ** 2)
    out = amplitude_ratio(insects_db - 1.5 + 1.2 * drift(3.7)) * rms_one(colour(white, core + skirt))
    for hz, db in SINGERS:
        turns = 2 * np.pi * np.cumsum(hz + 22. * drift(2.5)) / SR
        level = amplitude_ratio(db + insects_db + 58 + 5. * drift(6.))
        out = out + level * np.sin(turns + rng.uniform(0, 6, (2, 1)))
    cut = round(DROPOUT_START_S * SR)
    half_hz = PATH_CHORUS_WIDTH_HZ / 2
    path = band(white[:, cut:], PATH_CHORUS_HZ - half_hz, PATH_CHORUS_HZ + half_hz)
    return np.hstack([out[:, :cut], amplitude_ratio(PATH_CHORUS_DB) * rms_one(path)])


def outdoors():
    rumble_db, = in_time(BREEZE)
    murmur_db = np.minimum(MURMUR_DB + MURMUR_FOLLOWS * (rumble_db + 61), MURMUR_TOP_DB)
    white = stereo_noise(LIKENESS)
    rumble = rms_one(colour(white, amplitude_ratio(at_hz(RUMBLE + [(330, -52.5)]))))
    rumble = amplitude_ratio(rumble_db + 1.1 * drift(8.7)) * rumble
    murmur = amplitude_ratio(murmur_db + 2.5 * drift(4)) * rms_one(band(white, 230, 400))
    air = amplitude_ratio(AIR_DB) * rms_one(colour(white, amplitude_ratio(at_hz([(60, -38.0)] + AIR) + at_hz(QUIET_TOP))))
    return rumble + murmur + air


def scene():
    chopping = blows() + blade()
    brush = snaps() + rustle() + scrape()
    return chopping + brush + far_animals() + chorus() + outdoors()


def low_pass(x):
    return signal.sosfilt(signal.butter(12, 17150, fs=SR, output="sos"), x)


def record(dry):
    port_gain = amplitude_ratio(np.array([[.5], [-.5]]) * at_hz(PORTS)) * (HZ < 16800)
    ports = colour(0.85 * np.tanh(dry / 0.77), port_gain)
    t = np.arange(N) / SR
    away_s = np.maximum(DROPOUT_START_S - t, t - DROPOUT_END_S)
    gate = np.clip(away_s / .0015, .005, 1)
    return low_pass(ports * gate)


dry = scene()
out = record(dry)
put_to_file(out)
```